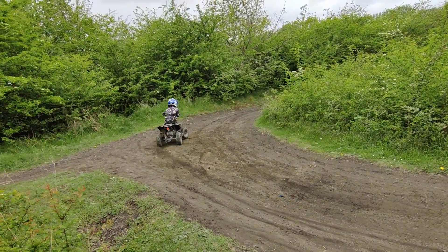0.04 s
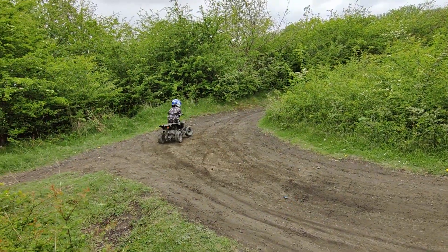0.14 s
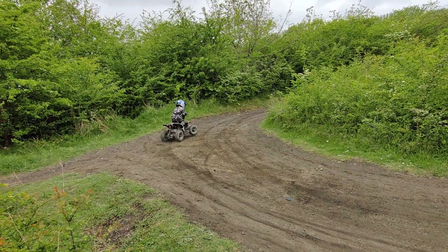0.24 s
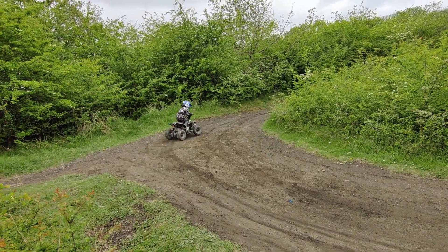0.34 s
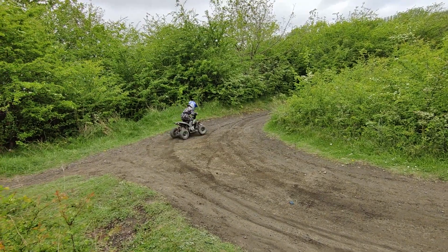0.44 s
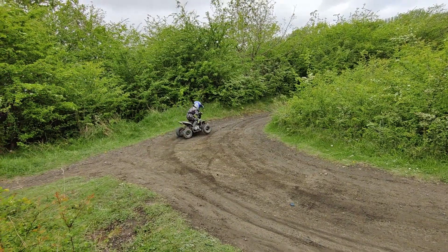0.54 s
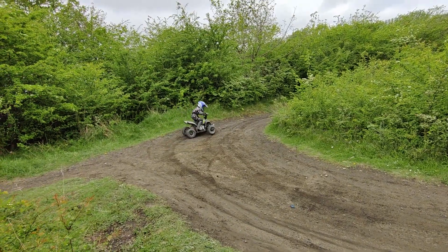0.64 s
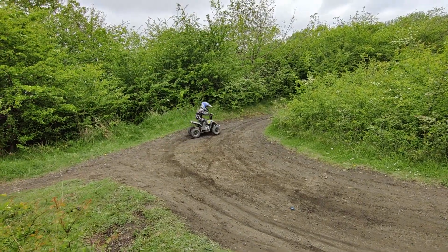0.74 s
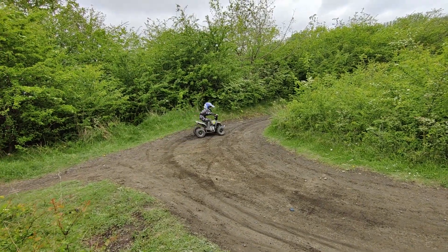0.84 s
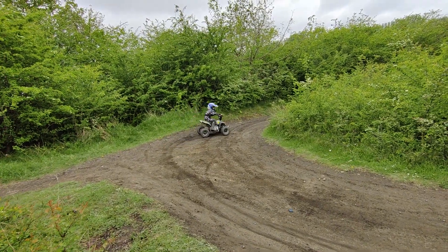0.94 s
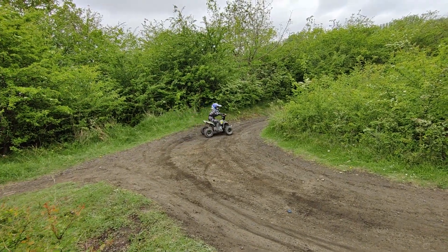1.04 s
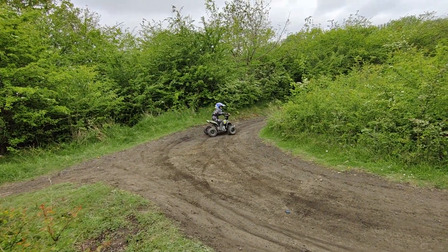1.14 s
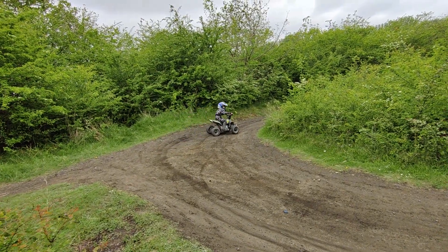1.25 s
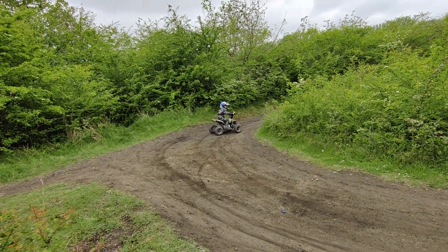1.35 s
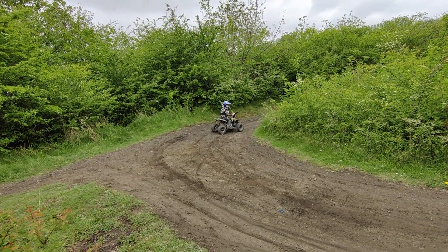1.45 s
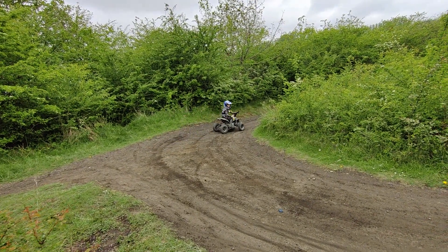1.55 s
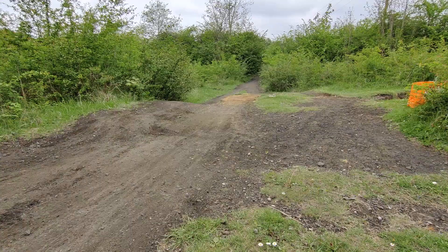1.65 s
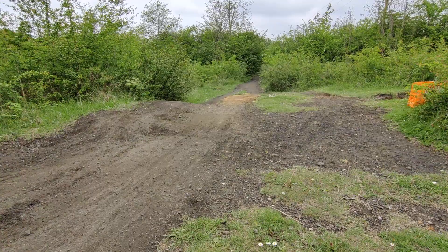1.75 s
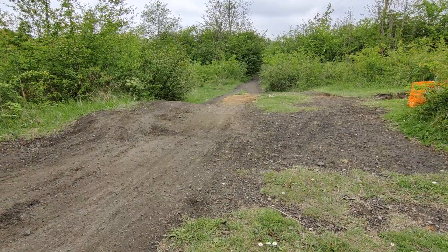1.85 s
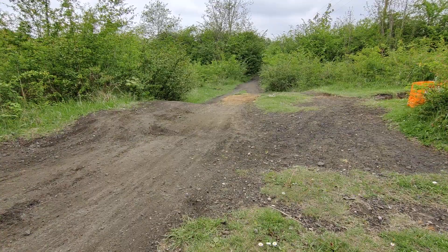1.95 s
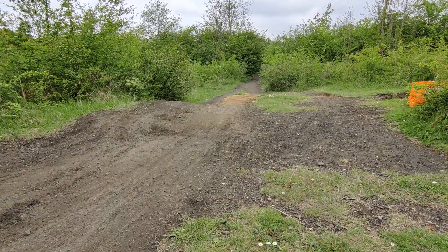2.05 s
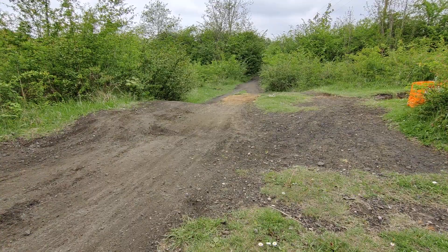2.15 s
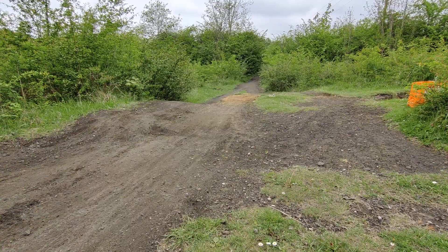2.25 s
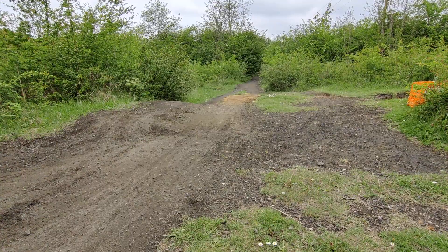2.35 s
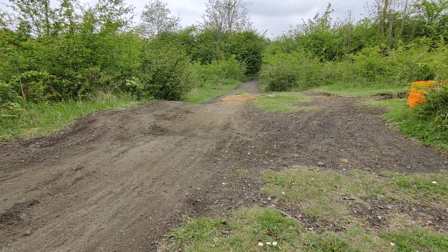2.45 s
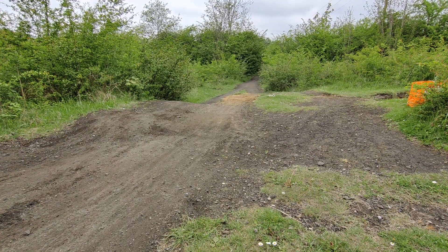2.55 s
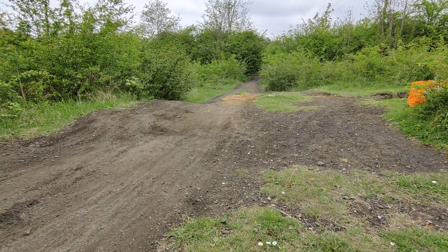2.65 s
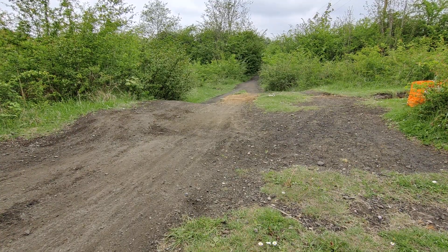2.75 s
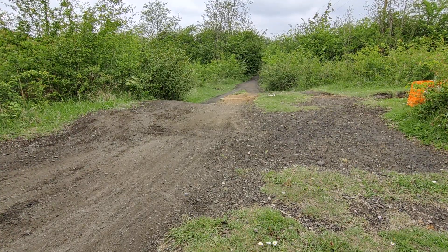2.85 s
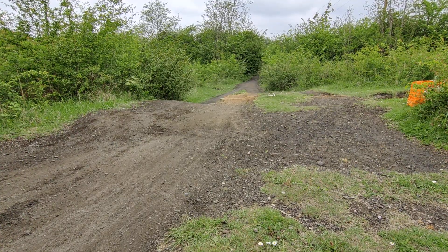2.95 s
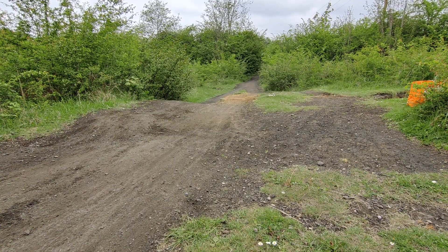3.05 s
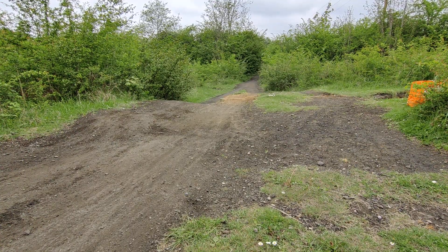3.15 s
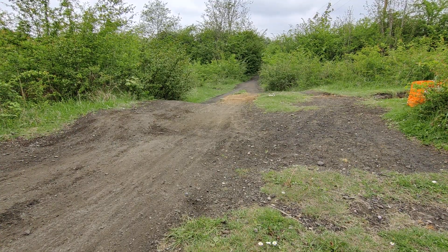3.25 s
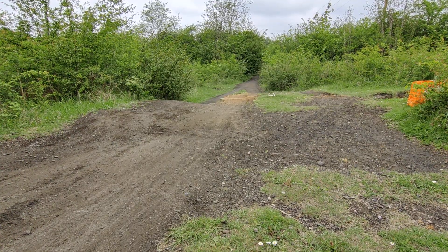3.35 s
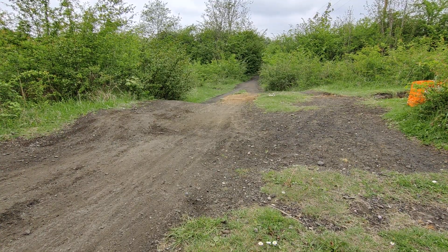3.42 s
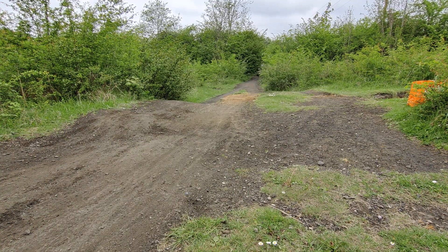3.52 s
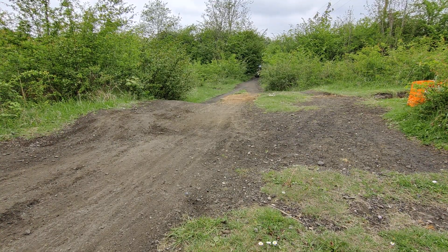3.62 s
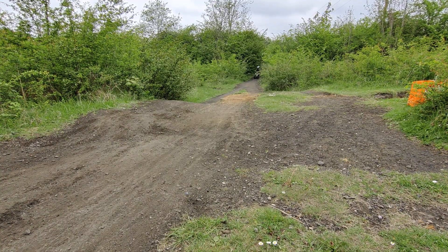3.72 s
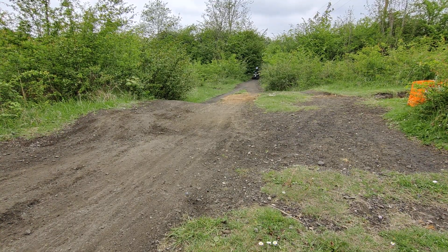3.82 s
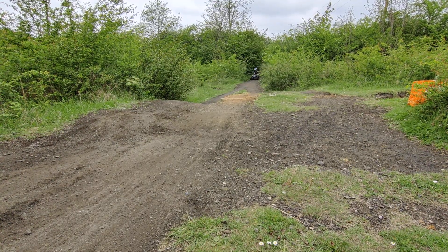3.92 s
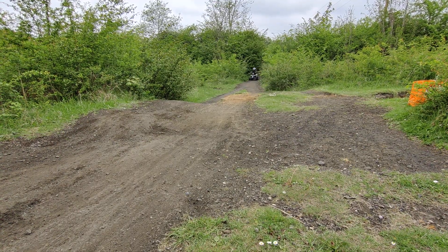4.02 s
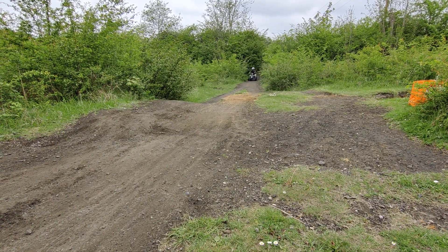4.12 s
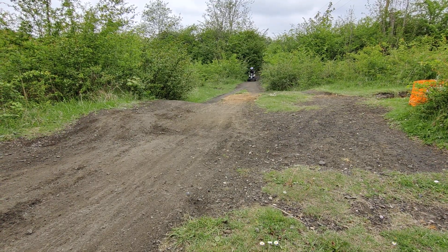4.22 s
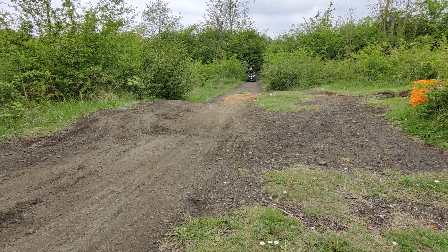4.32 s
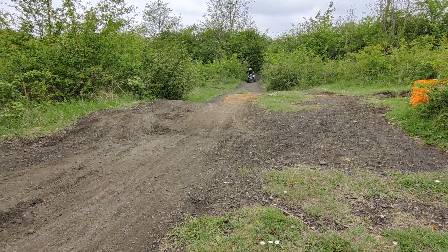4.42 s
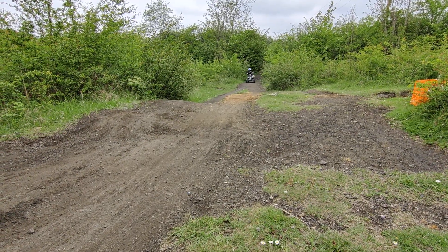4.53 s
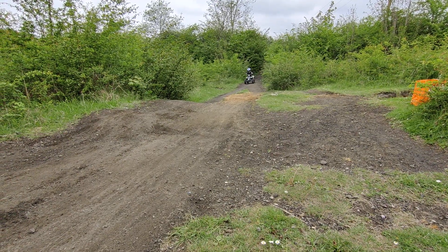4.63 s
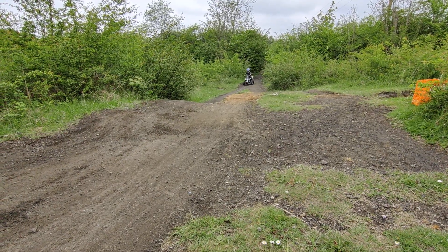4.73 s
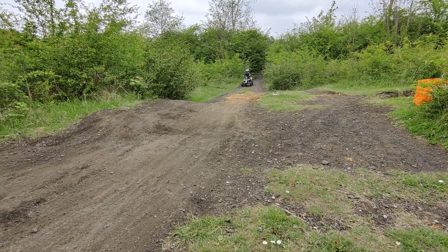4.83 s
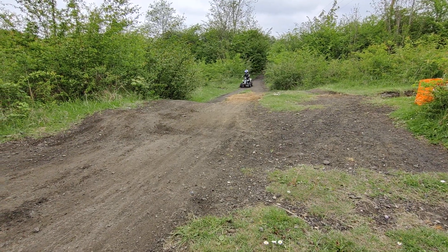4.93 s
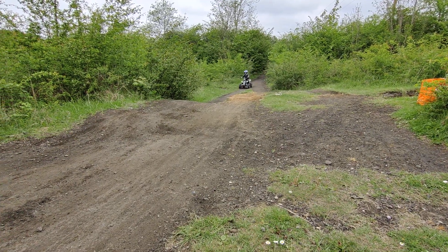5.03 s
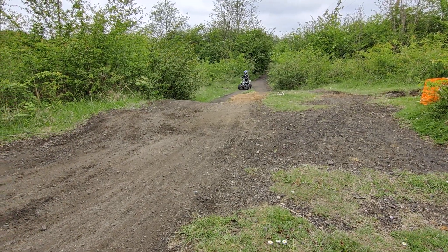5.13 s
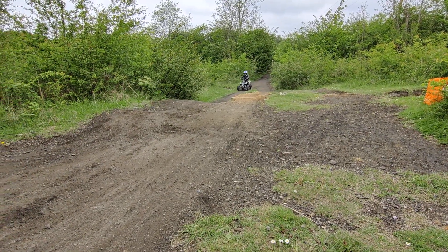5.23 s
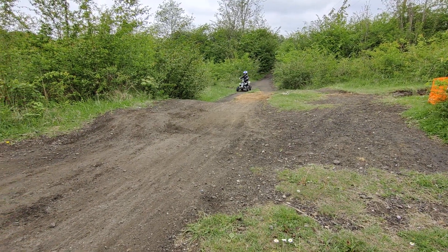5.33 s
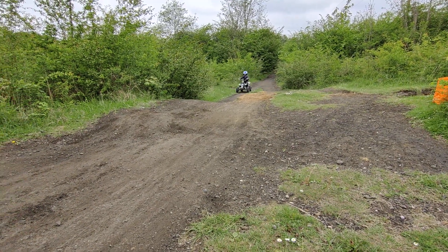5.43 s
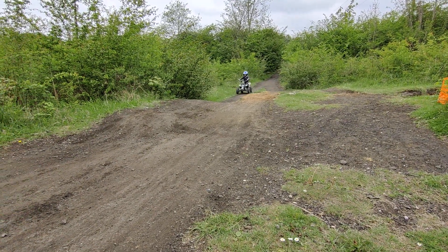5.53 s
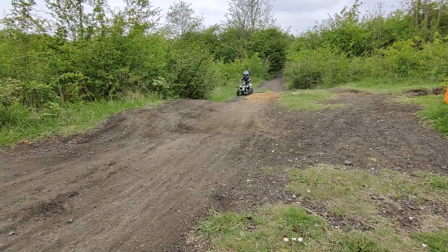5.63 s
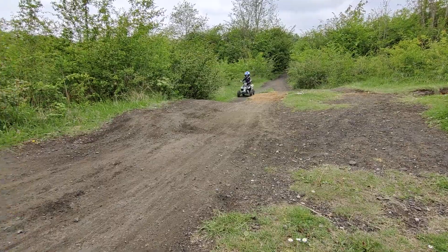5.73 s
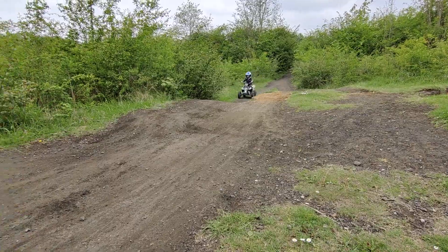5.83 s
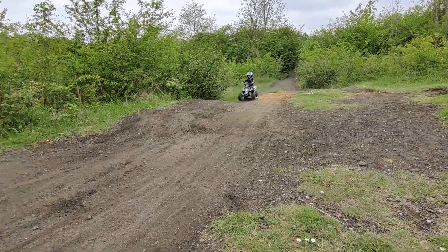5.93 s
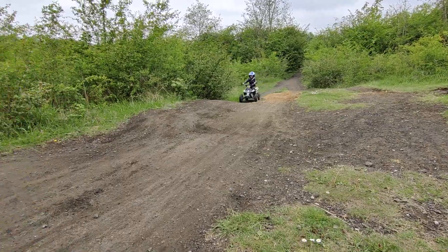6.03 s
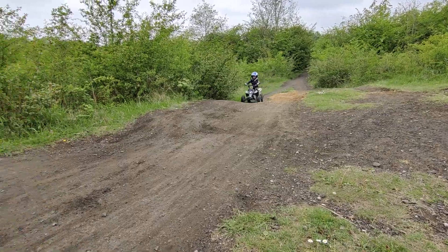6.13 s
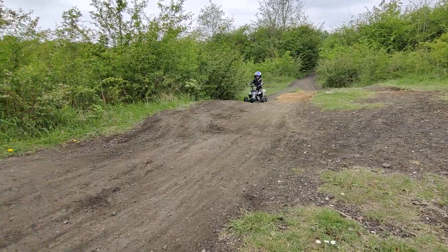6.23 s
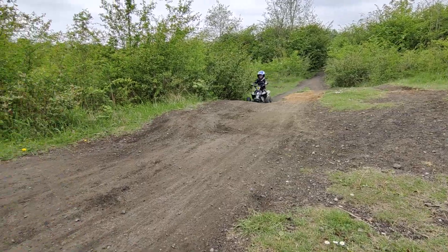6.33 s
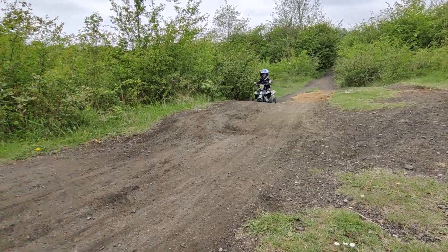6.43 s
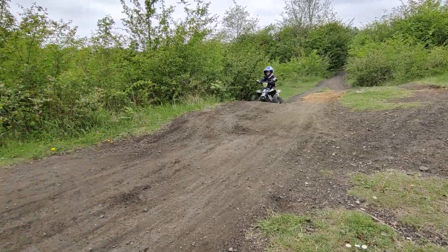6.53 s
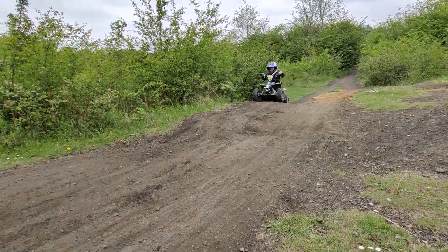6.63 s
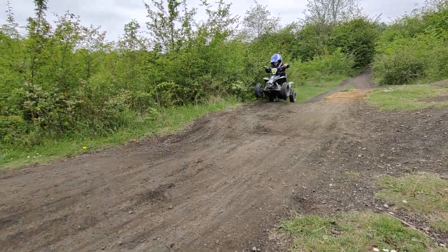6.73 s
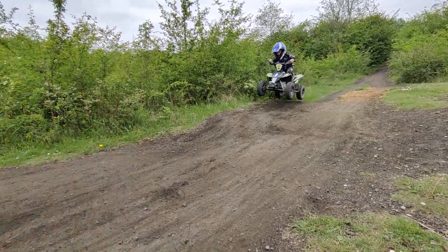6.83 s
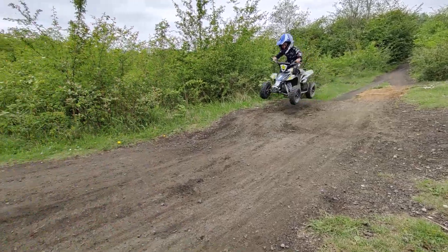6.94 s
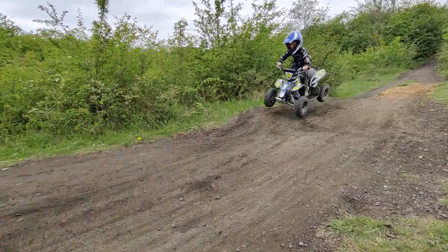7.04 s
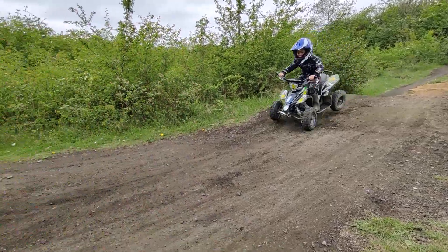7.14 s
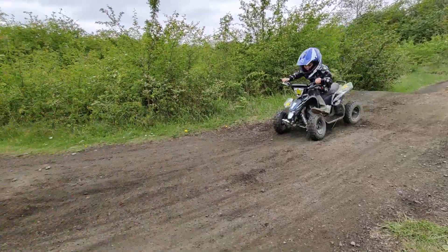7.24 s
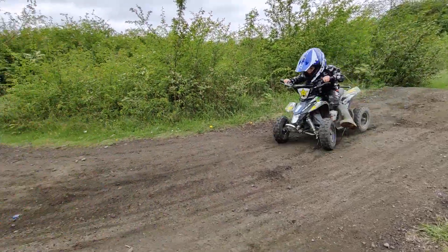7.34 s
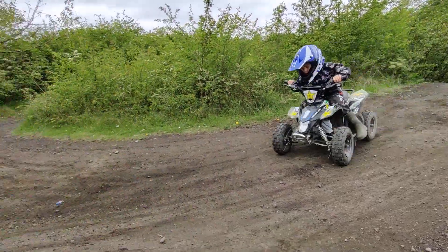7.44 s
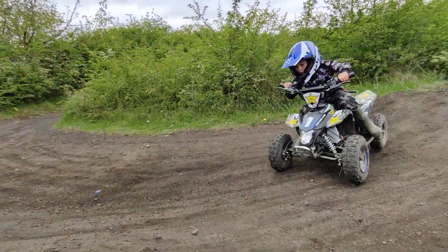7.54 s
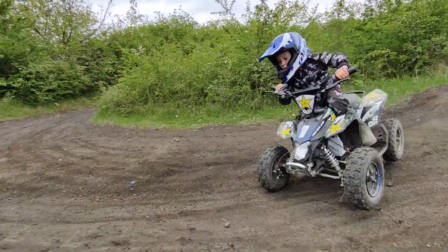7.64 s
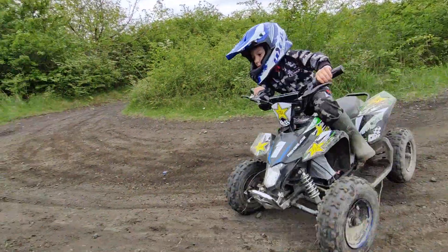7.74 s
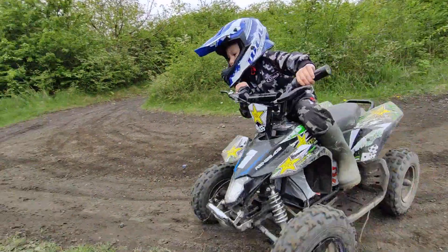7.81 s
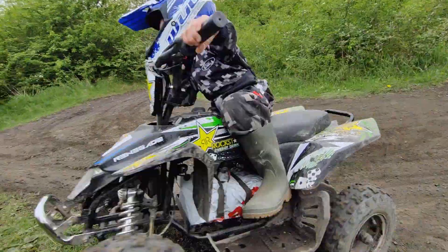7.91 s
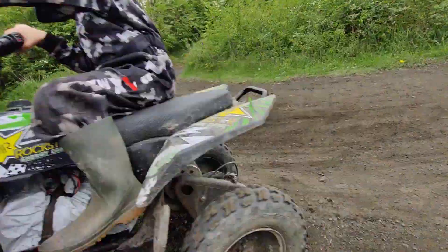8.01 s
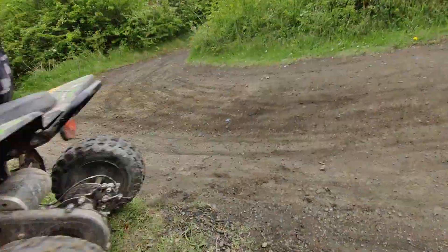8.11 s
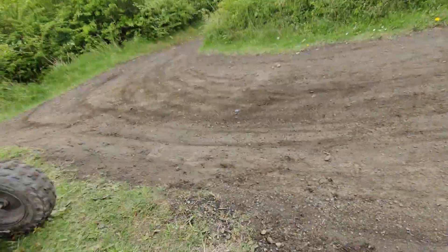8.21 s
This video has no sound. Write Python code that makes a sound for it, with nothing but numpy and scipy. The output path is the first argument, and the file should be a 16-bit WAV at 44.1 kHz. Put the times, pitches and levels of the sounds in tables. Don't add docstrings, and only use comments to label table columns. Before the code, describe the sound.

From 0 to 0.8 s a small electric quad rolls away nearby: bright gritty tyre crunch, gear whine around 2 kHz, plastic ticks, dull suspension bumps, flicked stones and tiny chain chinks. It fades from about 1 s, with scattered knocks and short bird whistles at 1.3-1.8 s over low wind rumble. A very short silence at 1.84 s cuts to a far, nearly silent place. From about 3.4 s a faint motor hum near 560 Hz and thin whine emerge, broken by chain slack, with sparse snaps; birds chirp from 4.9 to 6.2 s. Rolling grows after 5.3 s and ticks strengthen from 6.5 s. Around 7 s the hum sags in mid-jump; at 7.4 s heavy thuds mark the landing. A rough growl, wavering whine, crushed gravel and wind rumble pass very close, with hard bangs and cracking stones densest and loudest at 8.0-8.3 s, ending abruptly.

```python
import sys
import numpy as np
from scipy import signal
from scipy.fft import rfft, irfft, next_fast_len
from scipy.io import wavfile
from scipy.ndimage import map_coordinates

SR = 44100
rng = np.random.default_rng(int(sys.argv[2]) if len(sys.argv) > 2 else 0)


def bounce(signal):
    frames = np.transpose(np.atleast_2d(signal))
    limited = np.clip(frames, -1, 1)
    pcm = np.round(limited * 32767).astype(np.int16)
    wavfile.write(sys.argv[1], SR, pcm)


def volts_from_db(level):
    exponent = np.asarray(level, float) / 20
    return 10 ** exponent


N = 364707

CHANGE_S, RESUME_S, PASSING_FROM_S = 1.837, 1.918, 6.9
PORTS_ALIKE = .93
STEP_HZ, CUTOFF_HZ = 6950, 15850
FAR_UNTIL_S, FAR_TOP_HZ = 3.65, 12750
JOLT_EDGE_S = 0.0078
SLACK_DB, SLACK_EDGE_S = -12, 0.0045
TAUT_DB, TAUT_S = 7.5, 0.0044
PATCH_FROM_HZ, PATCH_HZ, PATCH_S, PATCH_DB = 6900, 450, .035, 3.5

# time_s, level_db
RUMBLE_LEVEL = [
    [(0.0, -25), (0.044, -35.5), (0.794, -29.5), (1.222, -39), (1.83, -37.5)],
    [(1.94, -80.5), (2.27, -59), (2.28, -61.5), (3.76, -52), (5.3, -48.5)],
    [(5.35, -43.5), (6.92, -36.5), (7.33, -40.5), (7.42, -28.5), (7.8, -28.5), (8.27, -28)],
]
# freq_hz, density_db_per_hz
RUMBLE_SPECTRUM = [(15, 0.5), (30, 3.5), (85, -1.5), (140, -7.5), (300, -18), (900, -91.5)]
# start_s, length_s, start_hz, end_hz, level_db
BIRD_NOTES = [(1.345, .04, 5850, 6200, -55), (1.49, .045, 5450, 4400, -48), (1.63, .035, 4750, 5050, -50),
              (1.635, .025, 3500, 2600, -47), (1.70, .03, 4500, 4250, -52), (1.768, .045, 4900, 2100, -47),
              (1.776, .016, 6900, 6500, -54), (4.89, .025, 4050, 4600, -55), (5.0, .034, 3450, 4800, -52),
              (5.19, .05, 5400, 5850, -64), (5.2, .015, 3350, 3700, -58), (5.065, .045, 4950, 4350, -57),
              (5.12, .034, 3300, 4650, -50), (5.238, .03, 3350, 4400, -51), (5.33, .045, 4400, 4900, -55),
              (5.40, .035, 4800, 4300, -56), (5.565, .035, 4200, 5000, -54), (5.725, .04, 5000, 4200, -54),
              (6.155, .034, 4150, 5300, -55)]
# start_s, upper_voice_db
FIGURE_STARTS = [
    (5.512, -4),
    (5.652, -8),
    (5.783, -8),
    (5.914, -2),
    (6.056, -1),
]
# delay_s, length_s, start_hz, end_hz, level_db
FIGURE_NOTES = [
    (0, .026, 5650, 5250, -51),
    (.002, .014, 4200, 3880, -53),
    (.012, .022, 3820, 4220, -45.5),
    (.033, .022, 3950, 2900, -47),
]

# time_s, rolling_level_db, grit_brightness_db
RIDE = [
    [(0.0, -33, 9.5), (0.72, -33.5, 1.5), (1.08, -45, -4.5), (1.4, -48, -1), (1.83, -47, -5.5)],
    [(1.94, -85, -12), (2.4, -71, -13.5), (2.95, -72, -9), (3.95, -63, -1.5), (4.8, -61, 0),
     (5.3, -56.5, -2.5), (5.74, -52.5, -2), (6.4, -50.5, -6), (6.53, -43.5, -8.5), (7.0, -38.5, -0.5),
     (7.2, -39.5, 1), (7.36, -40, 6.5), (7.41, -28, -4), (8.05, -30.5, 2.5), (8.27, -26, 5)],
]
# low_hz, high_hz
ROLL_BANDS = [(140, 420), (680, 1500), (2300, 4500), (4500, 7000), (7000, 15000)]
# freq_hz, density_db_per_hz
ROLL_SPECTRUM = [(110, -7), (250, -8), (420, -7), (700, -4), (1300, -8), (2200, -15), (3000, -17.5),
                 (4300, -14), (5500, -14), (6800, -24), (7300, -17), (13000, -29), (16000, -28)]
# offset_db, brightness_share, jolt_share
BAND_RESPONSE = [(0.5, -0.05, 1.07), (0, -0.11, 0.57), (2, 0.24, 0.85), (-6, 0.7, 0.9), (0.5, 0.61, 0.8)]
# freq_hz, likeness
ROLL_LIKENESS = [(30, .86), (130, .98), (400, .96), (1000, .82), (3000, .7), (5000, .5), (7500, .6),
                 (15000, .66)]
# start_s, change_db,
# length_s
JOLTS = [(0.135, 3.5, 0.028), (0.192, -5.5, 0.17), (0.394, -0.5, 0.061), (0.729, -8.5, 0.028),
         (0.758, 1.5, 0.044), (0.874, -5.5, 0.045), (0.936, 8.5, 0.051), (1.009, 6, 0.038),
         (1.134, 7, 0.033), (1.292, 6.5, 0.024), (1.628, 6, 0.05), (1.927, -12, 0.148), (2.929, 6.5, 0.036),
         (3.902, 7.5, 0.06), (5.36, 8.5, 0.051), (6.391, -2.5, 0.058), (7.06, -6.5, 0.032),
         (7.074, 6.5, 0.088), (7.233, -6.5, 0.02), (7.351, -3, 0.029), (7.565, 0, 0.035),
         (0.43, -1.5, .012), (0.791, -1, .012), (7.453, 6.5, 0.1), (8.078, 5.5, .08), (8.172, 6.5, 0.014)]

# time_s, pitch_hz
HUM_PITCH = [(3.4, 560), (4.2, 578), (6.3, 556), (6.9, 540), (6.97, 505), (7.0, 460), (7.05, 432),
             (7.18, 510), (7.3, 555), (7.38, 570)]
# time_s, level_above_rolling_db
HUM_LEVEL = [(3.4, -7), (4.1, 9.5), (4.7, 7), (5.4, 8), (6.1, 13), (6.5, 4.5), (6.9, 8), (6.99, 14),
             (7.2, 5), (7.3, 10.5), (7.38, -3)]
# start_s, length_s
SLACKS = [(3.98, .13), (4.16, .031), (4.23, .02), (4.28, .022), (4.49, .045), (4.61, .05), (4.77, .05),
          (4.87, .03), (5.1, .033), (5.38, .1), (5.65, .08), (5.87, .062), (5.99, .029), (6.08, .055),
          (6.23, .033), (6.4, .09), (7.055, .12)]
# time_s, pitch_hz, level_db
GROWL = [(7.38, 587.4, -24), (7.45, 575, -20.5), (7.56, 585, -21.5), (7.7, 500, -22.5), (7.82, 450, -26),
         (7.97, 440, -20.5), (8.1, 450, -16.5), (8.27, 509.8, -13.5)]
# time_s, pitch_hz, level_db
GROWL_OVERTONE = [(7.92, 890, -39), (7.97, 870, -27), (8.05, 840, -24.5), (8.09, 838, -40),
                  (8.15, 820, -44), (8.27, 870, -35)]
# time_s, pitch_hz, level_above_rolling_db
WHINE_LEAVING = [(0.0, 2130, -7), (0.05, 2207, 1), (0.15, 2190, -1), (0.2, 2110, -3.5), (0.27, 2210, -4),
                 (0.36, 2090, -19.5), (0.5, 2050, -10.5), (0.62, 1987, -18), (0.72, 2110, -6),
                 (0.9, 2170, -21.5), (1.83, 2127, -8)]
# time_s, pitch_hz, level_above_rolling_db
WHINE_COMING = [(3.0, 1890, -13), (3.4, 1905, -12), (3.5, 1870, 4), (3.62, 1910, -9), (3.72, 1890, -9),
                (3.85, 1884, -23), (4.15, 1991, -9), (4.38, 2000, 1), (4.55, 1981, -7), (4.78, 1940, -5),
                (5.0, 1908, -11), (5.2, 1703, -17), (6.3, 1702, -0.5), (7.05, 1744, -2), (7.15, 1670, -22)]
# time_s, pitch_hz, level_db
WHINE_PASSING = [(7.1, 1700, -43.5), (7.2, 1790, -41.5), (7.27, 1810, -37), (7.36, 1760, -49),
                 (7.47, 1775, -27.5), (7.58, 1690, -43), (7.72, 1770, -29), (7.81, 1780, -38),
                 (7.9, 1750, -32), (8.03, 1795, -32.5), (8.06, 1800, -41.5), (8.12, 1810, -27.5),
                 (8.27, 1760, -50.5)]
# time_s, pitch_hz, level_above_rolling_db
MESH = [(2.1, 2350, -6), (2.9, 2420, -8), (3.6, 2400, -2), (4.0, 2390, -4.5), (5.6, 2380, -12),
        (6.9, 2482, -24), (7.2, 2439, 4.5), (7.5, 2250, -8), (8.27, 2326, -1.5)]
# time_s, pitch_hz, level_above_rolling_db
MESH_HIGH = [(7.55, 4350, -7), (7.7, 4310, -15), (7.95, 4090, -18), (8.07, 4205, -14), (8.27, 4010, -17)]
# time_s, pitch_hz, level_above_rolling_db
THREADS = [
    [(0.0, 1666, 2), (0.04, 1690, -6), (0.09, 1790, -16)],
    [(0.0, 1930, 5), (0.06, 1986, -9), (0.12, 2067, -5.5), (0.2, 1970, -15), (0.27, 2010, -14)],
    [(4.45, 1650, -8), (4.55, 1630, 3), (4.62, 1640, -14), (4.68, 1700, -2), (4.88, 1646, -3),
     (5.05, 1680, -12)],
    [(6.97, 2480, -16), (7.03, 2460, -1), (7.09, 2500, -18)],
    [(7.9, 2200, -22), (8.0, 2240, -1), (8.1, 2300, -3), (8.2, 2260, -18)],
]

# time_s, peak_db, pitch_hz
BUMPS = [(0.442, -16.5, 307), (0.651, -15.5, 272), (0.757, -17, 281), (0.809, -18.5, 307),
         (1.039, -16.5, 273), (1.063, -18.5, 321), (1.141, -19, 228), (1.156, -22.5, 262),
         (1.643, -24, 253.5), (7.098, -19, 179), (7.401, -9, 275.5), (7.43, -8, 232.6), (7.453, -5, 172.6),
         (7.554, -11.5, 182), (7.879, -12.5, 171.7), (8.009, -10, 194), (8.111, -8, 266),
         (8.179, -11, 217.7), (8.209, -3, 269), (8.245, -1.5, 254)]
# time_s, peak_db, pitch_hz
KNOCKS = [(0.442, -15.5, 958), (0.729, -24, 2043), (0.765, -24.5, 1280), (0.802, -21, 1800),
          (0.811, -25.5, 1312), (0.836, -24, 2200), (0.914, -26.5, 1285), (0.945, -30.5, 2200),
          (1.048, -23.5, 776), (1.267, -26, 2270), (1.409, -48, 915), (1.473, -31, 870), (1.659, -31, 2200),
          (5.137, -58, 875), (5.936, -36.5, 1040), (6.022, -39.5, 1800), (6.139, -57, 990),
          (6.268, -35, 954), (6.917, -21, 1400), (7.09, -23.5, 1135), (7.261, -18.5, 1838),
          (7.385, -22, 1625), (7.541, -7, 1700), (7.883, -9, 920), (8.107, -8, 956), (8.174, -9.5, 1130)]
# time_s, peak_db, pitch_hz
TICKS = [(0.14, -14.5, 1527), (0.211, -10.5, 3460), (0.298, -18.5, 2220), (0.38, -21.5, 3570),
         (0.443, -18, 1500), (0.454, -11, 807), (0.491, -23.5, 2010), (0.558, -18, 728), (0.616, -28, 1985),
         (0.685, -21, 704), (0.729, -10.5, 1384), (0.765, -18, 1305), (0.767, -22, 3300),
         (0.802, -9.5, 3460), (0.811, -12.5, 1374), (0.836, -16.5, 1380), (0.841, -19.5, 2440),
         (0.919, -24, 1327), (0.946, -24.5, 1975), (0.963, -18.5, 830), (1.028, -17, 2630),
         (1.05, -28, 1443), (1.095, -23.5, 2220), (1.674, -24, 1296), (2.931, -68, 964), (3.707, -47, 1900),
         (3.964, -43.5, 2410), (4.196, -47.5, 1600), (4.666, -39, 1700), (5.138, -43, 880),
         (5.619, -30.5, 1050), (6.14, -40, 1000), (6.268, -42.5, 900), (6.426, -32, 1040),
         (6.531, -22.5, 1510), (6.632, -21, 1110), (6.799, -18.5, 976), (6.986, -18.5, 2920),
         (7.048, -19.5, 2430), (7.097, -29.5, 3540), (7.124, -21.5, 3700), (7.168, -24, 3380),
         (7.183, -22.5, 1700), (7.214, -26.5, 3700), (7.253, -20, 3300), (7.384, -17, 1180),
         (7.437, -19, 3880), (7.52, -6.5, 3700), (7.606, -14.5, 1674), (7.631, -14, 2955),
         (7.746, -11, 3030), (7.858, -27.5, 4070), (7.884, -14, 1280), (8.0, -10, 2290),
         (8.075, -19.5, 1827), (8.112, -9, 1920), (8.125, -12.5, 2100), (8.139, -18.5, 4870),
         (8.239, -19.5, 3700)]
# time_s, peak_db, pitch_hz
SNAPS = [
    (1.027, -20.5, 740),
    (1.472, -20.5, 708),
    (4.307, -46.5, 581),
    (4.668, -42, 565),
    (5.137, -40.5, 579),
    (6.024, -35, 552),
    (6.139, -37.5, 557),
    (7.261, -20, 1750),
]
# time_s, peak_db, pitch_hz
CHINKS = [
    (0.3876, -30, 6250),
    (0.522, -30, 6180),
    (0.5404, -39, 6430),
    (0.595, -34, 6140),
    (0.6988, -35.5, 6700),
]
# time_s, peak_db
STONES = [(0.1351, -38.5), (0.2783, -16.5), (0.381, -30.5), (0.467, -32.5), (0.5736, -19.5), (0.765, -19),
          (0.801, -25.5), (0.9438, -25), (1.4709, -30), (5.7078, -34.5), (6.226, -37), (6.4272, -35.5),
          (7.0985, -31), (7.1255, -22), (7.217, -24.5), (7.2544, -26), (7.3861, -24), (7.436, -26.5),
          (7.6025, -35.5), (7.7052, -17.5), (7.943, -41), (7.968, -24.5), (8.073, -9.5), (8.116, -11),
          (8.1766, -7), (8.2073, -16), (8.2394, -6.5)]

# freq_hz, lag_turns
LAG_LEAVING = [(0, 0), (900, .1), (1600, .2), (1800, .5), (2850, 2.5), (3100, 3), (4000, 3.37), (4800, 3.5),
               (6000, 3.85), (7000, 4)]
# freq_hz, lag_turns
LAG_COMING = [(0, 0), (700, .03), (1100, .22), (1280, .5), (1780, 1.5), (2170, 2.5), (2640, 3.5),
              (3450, 5.5), (3600, 5.8), (5000, 5.8), (7200, 6)]
# freq_hz, lag_turns
LAG_PASSING = [(0, 0), (1230, .03), (1520, .93), (1800, 1), (2050, 1.4), (2500, 2), (3500, 2.5), (4100, 3),
               (5000, 3.4), (5800, 3.5), (7300, 4)]
# freq_hz, both_ports_db, left_minus_right_db
PATH_LEAVING = [(60, -1, 3.5), (342, 1, 0.5), (444, -5, 6.5), (750, 4, -0.5), (1035, -4, 5),
                (2200, 5.5, -1), (2500, 1, -0.5), (3170, -3, -1.5), (6800, -6, 1.5), (12050, -5, 7.5)]
# freq_hz, both_ports_db, left_minus_right_db
PATH_COMING = [(60.4, 2.5, 1.5), (287, 0.5, 0.5), (640, -2.5, 3), (820, -3.5, 2.5), (1040, 4, -3),
               (1420, 0.5, 2), (2090, 2, -1), (3700, -1.5, 1), (4270, -2, 4.5), (4560, -5, -3),
               (6420, 0.5, 9.5), (8000, -5.5, 7), (12200, 3, 0)]
# freq_hz, both_ports_db, left_minus_right_db
PATH_PASSING = [(60, 4.5, 2.5), (275, 2, -0.5), (372, -6.5, 4.5), (450, -3.5, 1.5), (1200, 2, 0.5),
                (1400, -0.5, 3), (1800, 6, 1.5), (2710, -2.5, 1.5), (3300, 2, 3), (4970, -1, 1.5),
                (6000, 3, 3), (7690, -5, 5), (12400, 4, 0.5)]


def rms_one(x):
    return x / np.sqrt(np.mean(x ** 2) + 1e-20)


def in_time(tables):
    s, *columns = np.transpose(np.vstack(tables))
    return [np.interp(np.arange(N) / SR, s, c) for c in columns]


def at_hz(points, hz, column=1):
    points = np.array(points)
    return np.interp(np.log(hz), np.log(points[:, 0]), points[:, column])


def bandpass(low_hz, high_hz, x):
    return signal.sosfilt(signal.butter(2, [low_hz, high_hz], "band", fs=SR, output="sos"), x)


def drift(rate_hz):
    r = np.exp(-80 * np.pi * rate_hz / SR)
    noise = rng.standard_normal(N // 40 + 2002)
    slow = signal.lfilter([1], [1, -2 * r, r * r], noise)[2000:]
    return np.interp(np.arange(N) / 40, np.arange(len(slow)), rms_one(slow))


def low_noise(width_hz):
    sos = signal.butter(2, width_hz / 2, fs=SR, output="sos")
    a, b = signal.sosfilt(sos, rng.standard_normal((2, N)))
    return rms_one(a) + 1j * rms_one(b)


def stereo(common, apart, alike):
    return np.array([common, alike * common + np.sqrt(1 - alike ** 2) * apart])


def spells(starts_s, lengths_s, heights_db, edge_s):
    t, out = np.arange(N) / SR, np.zeros(N)
    for s, length_s, height_db in np.broadcast(starts_s, lengths_s, heights_db):
        end_s = s + length_s + edge_s
        part = slice(round(s * SR), round(end_s * SR))
        out[part] += height_db * np.clip(np.minimum(t[part] - s, end_s - t[part]) / edge_s, 0, 1)
    return out


def rumble():
    hz = np.maximum(np.fft.rfftfreq(N, 1 / SR), 1)
    spectrum = rfft(rng.standard_normal((2, N))) * volts_from_db(at_hz(RUMBLE_SPECTRUM, hz)) * (hz > 12)
    level_db = in_time(RUMBLE_LEVEL)[0] + 1.1 * drift(2.2)
    return volts_from_db(level_db) * stereo(*rms_one(irfft(spectrum, N)), PORTS_ALIKE)


def bird():
    out, notes = np.zeros(N + SR), list(BIRD_NOTES)
    for s, upper_db in FIGURE_STARTS:
        for delay_s, *note, level_db in FIGURE_NOTES:
            notes.append((s + delay_s, *note, level_db + upper_db * (delay_s == 0)))
    for s, length_s, start_hz, end_hz, level_db in notes:
        part = np.linspace(0, 1, round(length_s * SR))
        bend = .7 if end_hz > start_hz else 1
        hz = start_hz + (end_hz - start_hz) * part ** bend
        whistle = np.sin(2 * np.pi * np.cumsum(hz) / SR) * np.sin(np.pi * part) ** .8 * 1.2
        out[round(s * SR):][:len(part)] += volts_from_db(level_db) * whistle
    song = out[:N] + .2 * np.roll(out[:N], round(.017 * SR))
    return song * np.where(np.arange(N) / SR < CHANGE_S, [[1.4], [.8]], 1)


def stones():
    out, t = np.zeros((2, N + SR)), np.arange(SR // 20) / SR
    for s, peak_db in STONES:
        crack = stereo(*rng.standard_normal((2, len(t))), .5) * volts_from_db(-60 * t / .032)
        out[:, round(s * SR):][:, :len(t)] += volts_from_db(peak_db + 3) * crack
    return bandpass(2500, 7000, out[:, :N]) + .18 * np.diff(out)[:, :N]


def blows(events, partials, crack_db):
    out, t = np.zeros(N + SR), np.arange(SR // 8) / SR
    chance = rng.normal(0, 1, (len(events), len(partials)))
    noise = rng.standard_normal((len(events), len(t)))
    cracks = signal.lfilter([.5], [1, -.8], noise) * volts_from_db(crack_db - 60 * t / .035)
    for (s, peak_db, hz), luck, sound in zip(events, chance, cracks):
        onset = np.minimum(t * hz / .8, 1)
        for (ratio, level_db, t60_s), spread in zip(partials, luck):
            decay = volts_from_db(-60 * t / t60_s * max(hz / 2000, 1))
            ring = np.sin(2 * np.pi * hz * ratio * t) * decay * onset
            sound = sound + volts_from_db(level_db + 2 * spread) * ring
        out[round(s * SR):][:len(t)] += volts_from_db(peak_db) * sound
    return out[:N]


def frame_blows():
    bumps = blows(BUMPS, [(1.017, 1.0, 0.049), (0.33, -25.5, 0.15), (7.3, -25.0, 0.083)], crack_db=-21.0)
    knocks = blows(KNOCKS, [(1, -1, .032), (1.3, -6, .02), (.75, -6, .022), (1.7, -8, .018)], crack_db=-8)
    ticks = blows(TICKS, [(1, -1, .016), (1.4, -6, .01), (.7, -8, .012)], crack_db=-16)
    return bumps + knocks + ticks + blows(CHINKS, [(1, -3, .05)], crack_db=-30)


def snaps():
    return blows(SNAPS, [(1, -4, .014), (1.6, -8, .01)], crack_db=-6)


def rough_tone(pitch, level, width_hz, steady, octave_db, base_db=0):
    hz, level_db = in_time([pitch])[0], in_time([level])[-1]
    t, first_s, last_s = np.arange(N) / SR, level[0][0], level[-1][0]
    turn = np.exp(2j * np.pi * np.cumsum(hz) / SR) * (steady + low_noise(width_hz))
    octave = np.real(turn ** 2 / np.abs(turn))
    tone = rms_one(turn.real) + volts_from_db(octave_db) * rms_one(octave)
    return volts_from_db(base_db + level_db) * tone * (t >= first_s) * (t <= last_s)


def gears(near_db):
    def line(table, width_hz, steady, octave_db, base_db=near_db):
        return rough_tone(table, table, width_hz, steady, octave_db, base_db)

    whine = line(WHINE_COMING, 200, .1, -20)
    whine += line(WHINE_LEAVING, 220, .15, -22)
    whine += line(WHINE_PASSING, 90, .7, -25, base_db=0)
    mesh = line(MESH, 340, 0, -20) + line(MESH_HIGH, 300, .1, -30)
    return whine + mesh + sum(line(rows, 50, .8, -30) for rows in THREADS)


def motor(near_db):
    chain_db = spells(*np.transpose(SLACKS), SLACK_DB, SLACK_EDGE_S)
    taut_s = np.sum(SLACKS, axis=1) + SLACK_EDGE_S / 2
    chain_db += spells(taut_s, TAUT_S, TAUT_DB, SLACK_EDGE_S)
    hum = rough_tone(HUM_PITCH, HUM_LEVEL, width_hz=90, steady=.9, octave_db=-19, base_db=near_db + chain_db)
    growl = rough_tone(GROWL, GROWL, width_hz=170, steady=.2, octave_db=-14)
    growl += rough_tone(GROWL_OVERTONE, GROWL_OVERTONE, width_hz=60, steady=.6, octave_db=-30)
    return hum + growl


def grit(per_s, spread_db, smooth):
    sizes = volts_from_db(spread_db * np.minimum(rng.exponential(1, (2, 2, N)), 5))
    sizes *= rng.choice([-1, 1], (2, 2, N))
    born = rng.random((2, 2, N)) < per_s * volts_from_db(3.0 * drift(30)) / SR
    return rms_one(sizes * born) + smooth * rng.standard_normal((2, 2, N))


def patchy(x):
    hz, s, cells = signal.stft(x, SR, nperseg=512)
    luck = rng.standard_normal((int(SR / 2 / PATCH_HZ) + 2, int(N / SR / PATCH_S) + 3))
    where = np.meshgrid(hz / PATCH_HZ, s / PATCH_S, indexing="ij")
    field = 1.4 * map_coordinates(luck, where, order=1)
    gain = volts_from_db(PATCH_DB * np.where(field < 0, 2 * field, .5 * field))
    gain = np.where(hz[:, None] > PATCH_FROM_HZ, rms_one(gain), 1)
    return signal.istft(cells * gain, SR, nperseg=512)[1][:, :N]


def rolling():
    level_db, bright_db = in_time(RIDE)
    s, jolt_db, length_s = np.transpose(JOLTS)
    jolts_db = spells(s, length_s, jolt_db, JOLT_EDGE_S)
    levels_db = np.array([level_db + offset_db + bright * bright_db + shake * jolts_db
                          for offset_db, bright, shake in BAND_RESPONSE])
    grid_hz = np.arange(100., 16000, 10)
    power = volts_from_db(2 * at_hz(ROLL_SPECTRUM, grid_hz)) * 10
    levels_db -= [[10 * np.log10(power[(grid_hz > lo) & (grid_hz < hi)].sum())] for lo, hi in ROLL_BANDS]
    centres = np.log([np.sqrt(lo * hi) for lo, hi in ROLL_BANDS])
    source = grit(per_s=2700, spread_db=3.0, smooth=0.55)
    shake = drift(37)
    edges_hz = 110 * 2 ** (np.arange(23) / 3)
    wide = np.where(np.arange(N) / SR > PASSING_FROM_S, 2.5, 1)
    out = 0
    for k, (low, high) in enumerate(zip(edges_hz, edges_hz[1:])):
        hz = np.sqrt(low * high)
        share = np.array([np.interp(np.log(hz), centres, row) for row in np.eye(len(centres))])
        pair = rms_one(bandpass(low, high, source[k % 2]))
        gain_db = share @ levels_db + at_hz(ROLL_SPECTRUM, hz) + 10 * np.log10(high - low)
        gain_db += 1.07 * shake + 1.91 * drift(72)
        out = out + volts_from_db(gain_db) * stereo(*pair, at_hz(ROLL_LIKENESS, hz) ** wide)
    return patchy(out)


def scene():
    near_db = in_time(RIDE)[0]
    background = rumble() + bird()
    struck = stones() + frame_blows() + snaps()
    return background + struck + gears(near_db) + motor(near_db) + rolling()


def lose_treble(x, share, top_hz, order, size):
    hz = np.maximum(np.fft.rfftfreq(size, 1 / SR), 5000)
    return x - share * irfft(rfft(x, size) / (1 + (top_hz / hz) ** order), size)[:, :N]


def roll_off(x):
    return signal.sosfilt(signal.butter(12, 15940, fs=SR, output="sos"), x)


def record(dry):
    size, t = next_fast_len(N + 4096), np.arange(N) / SR
    hz = np.maximum(np.fft.rfftfreq(size, 1 / SR), 1)
    treble = volts_from_db(-7 * np.clip((hz - STEP_HZ) / 300 + 1, 0, 1)) / (1 + (hz / CUTOFF_HZ) ** 80)
    spectra = rfft(dry, size) * treble
    passing = np.clip((t - PASSING_FROM_S) / .3, 0, 1)
    coming = np.clip((t - RESUME_S) / 0.037, 0, 1) * (1 - passing)
    paths = [(t < CHANGE_S, LAG_LEAVING, PATH_LEAVING), (coming, LAG_COMING, PATH_COMING),
             (passing, LAG_PASSING, PATH_PASSING)]
    out = 0
    for share, lag, path in paths:
        late = np.exp(-2j * np.pi * np.interp(hz, *np.transpose(lag)))
        gains_db = at_hz(path, hz) + at_hz(path, hz, column=2) * [[.5], [-.5]]
        gains = volts_from_db(gains_db) * [np.ones_like(late), late]
        out = out + share * irfft(spectra * gains, size)[:, :N]
    far = (t > CHANGE_S) * np.clip((FAR_UNTIL_S - t) / .2 + 1, 0, 1)
    out = lose_treble(out, far, FAR_TOP_HZ, 150, size)
    farthest = (t > CHANGE_S) * np.clip((2.72 - t) / .05, 0, .8)
    out = lose_treble(out, farthest, 9700, 100, size)
    return roll_off(np.clip(out, -.98, .98))


dry = scene()
out = record(dry)
bounce(out)
```